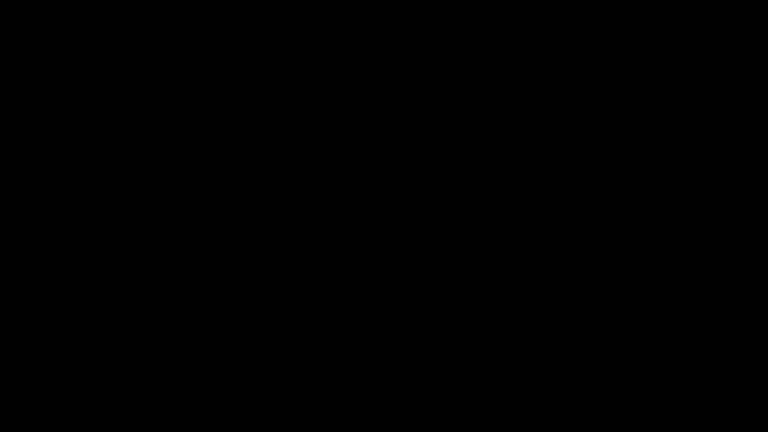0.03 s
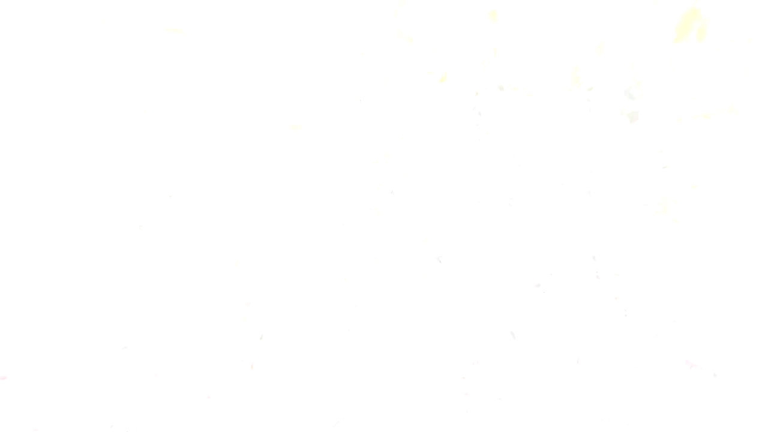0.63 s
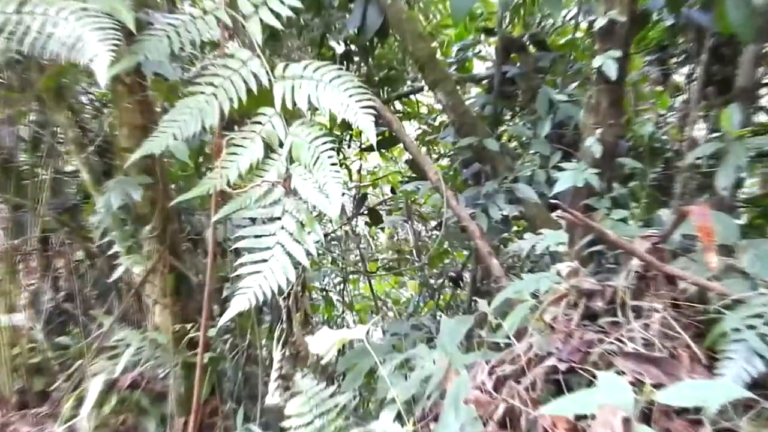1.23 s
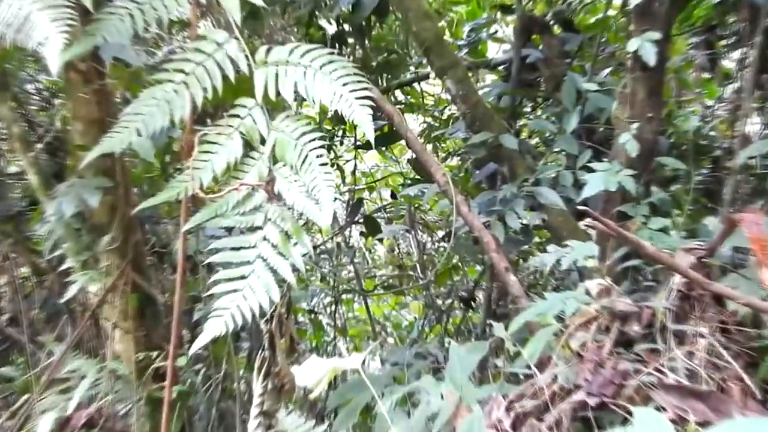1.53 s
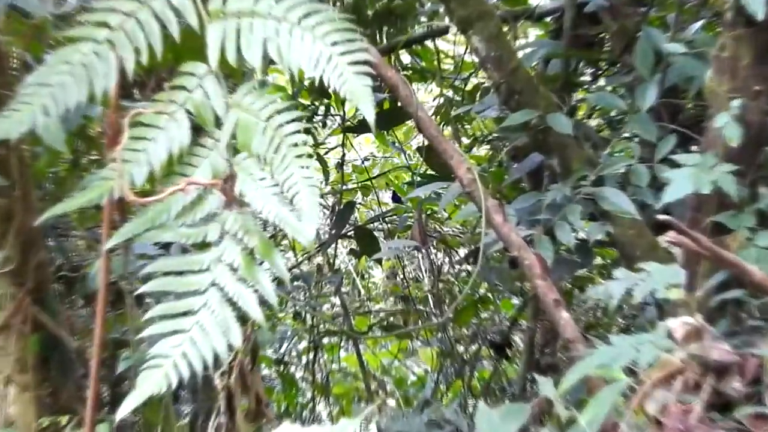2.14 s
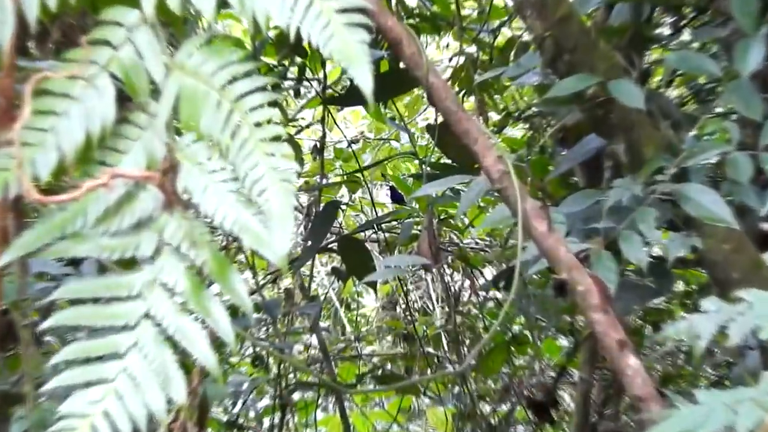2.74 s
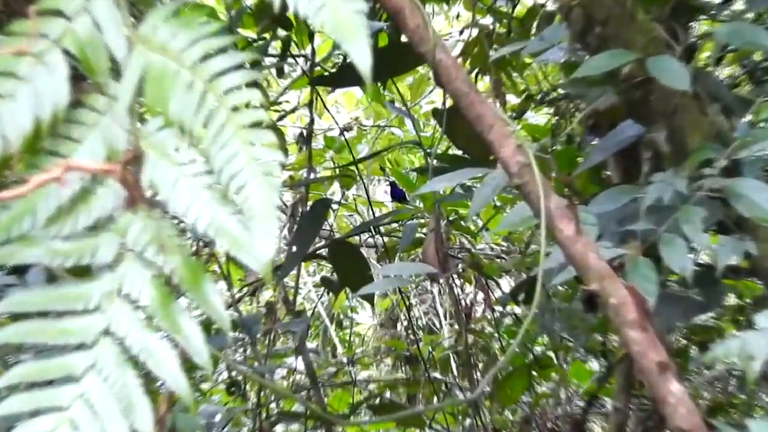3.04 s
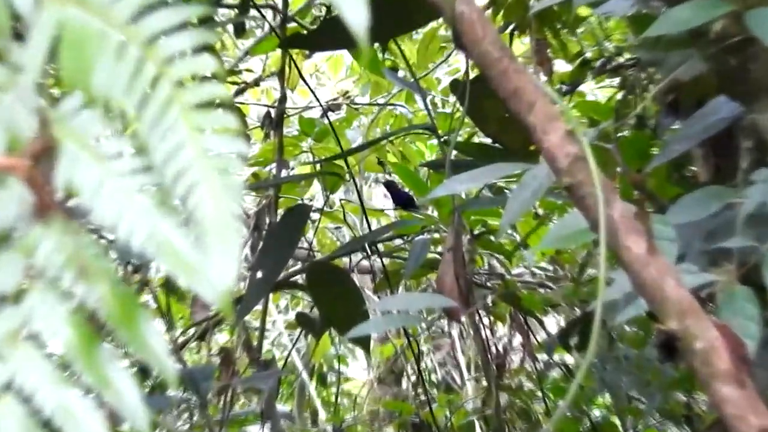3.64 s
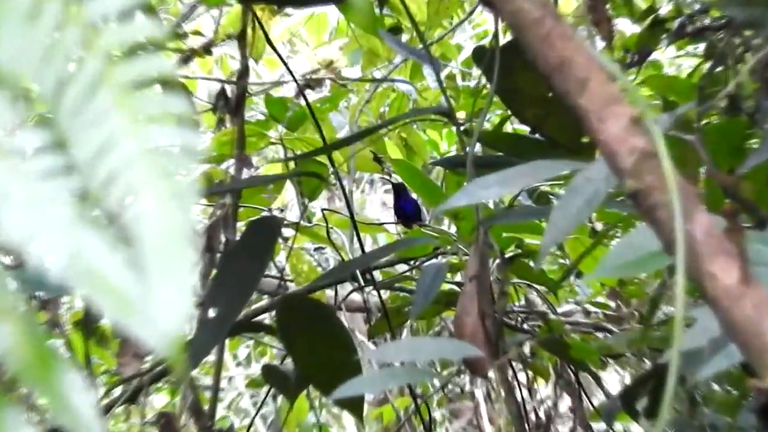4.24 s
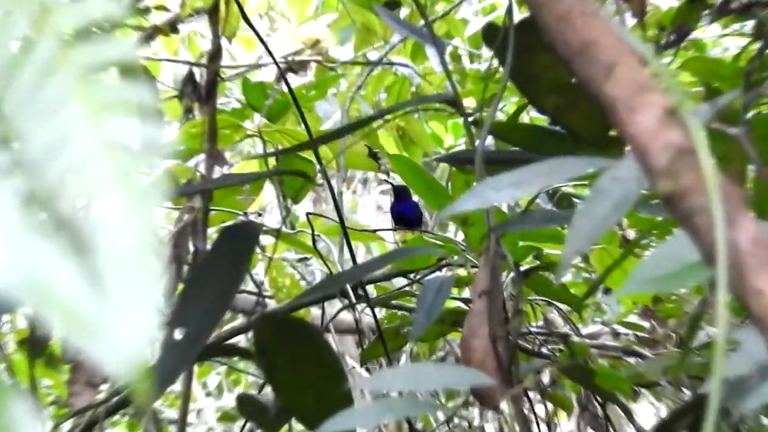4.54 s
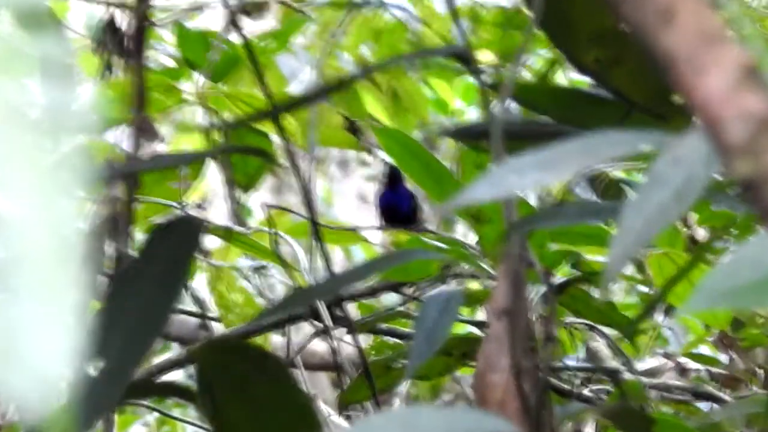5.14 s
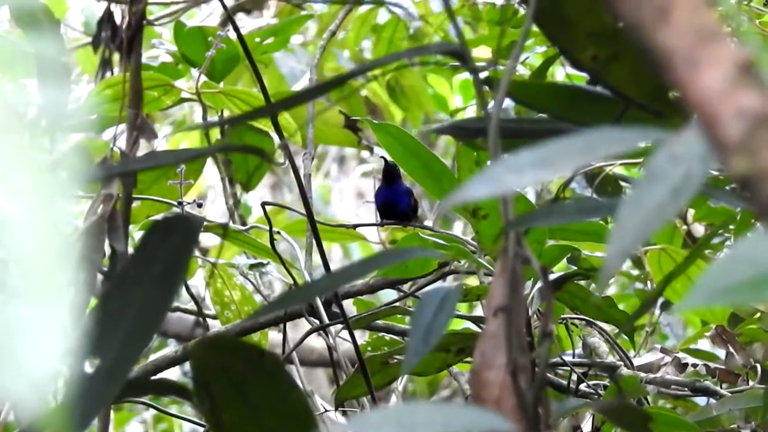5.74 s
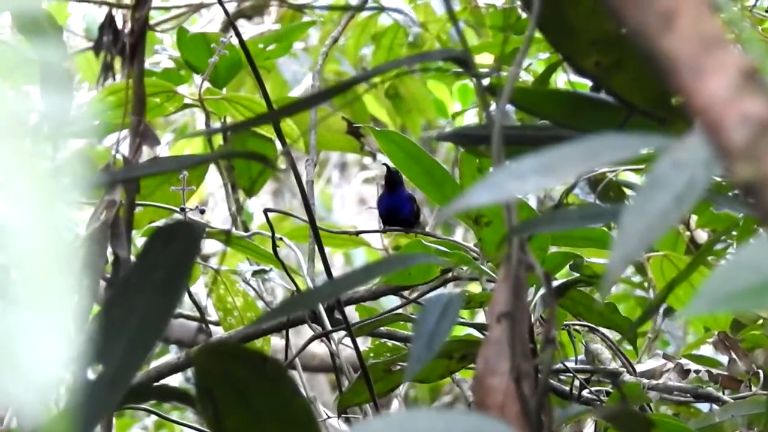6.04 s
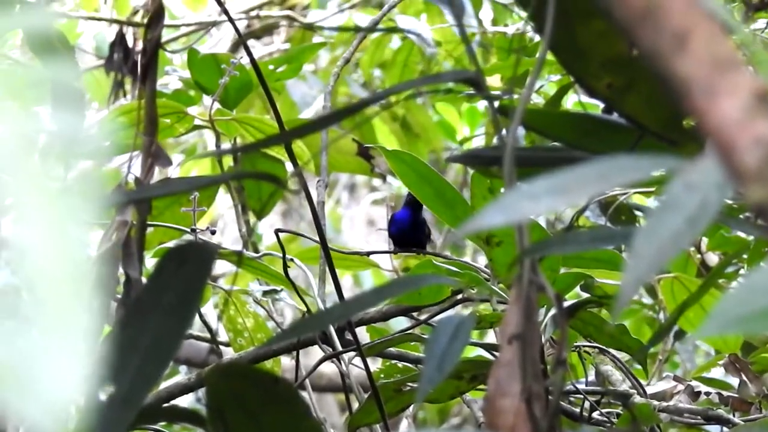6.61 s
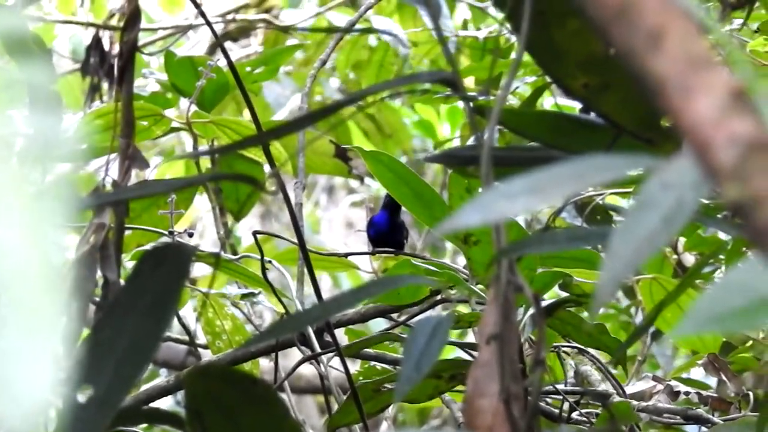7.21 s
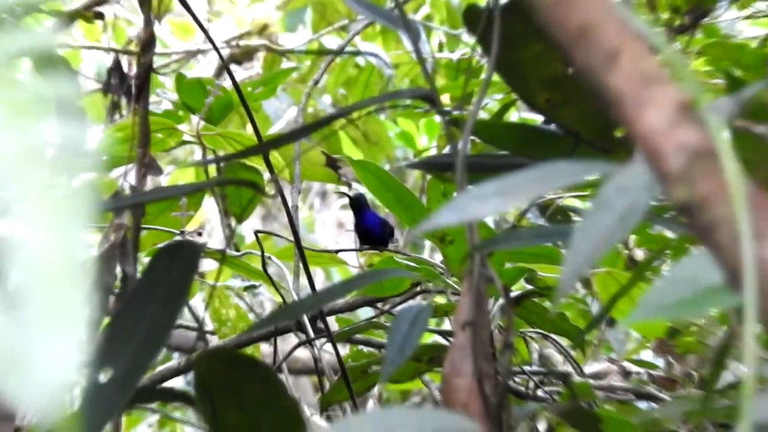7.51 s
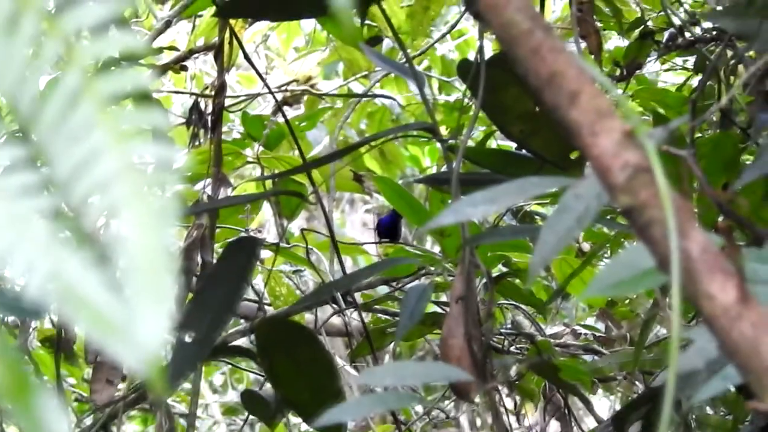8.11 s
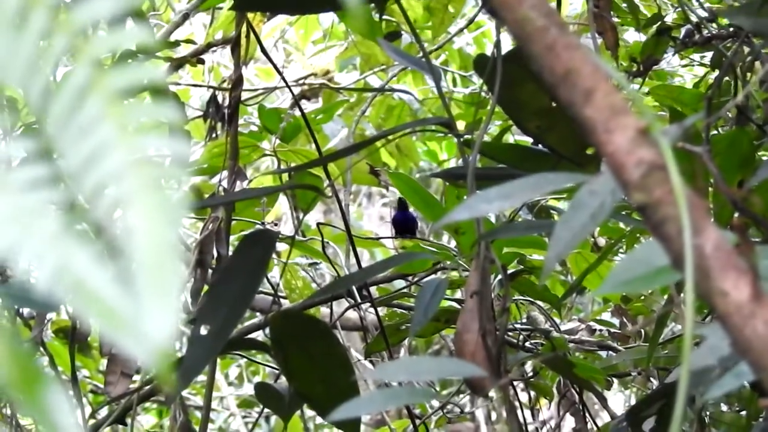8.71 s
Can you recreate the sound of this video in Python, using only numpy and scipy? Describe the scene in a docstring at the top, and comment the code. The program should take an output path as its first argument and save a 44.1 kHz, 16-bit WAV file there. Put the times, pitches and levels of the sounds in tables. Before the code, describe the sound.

A hummingbird repeats sharp, high chips in a forest, over a faint steady hiss.

```python
"""Dense forest, where a perched hummingbird gives sharp chips: long arched ones and short buzzy slurs.
Each is a frequency-modulated tone from the syrinx, loudest as its pitch passes about 6.3 kHz, then
scattered by leaves and trunks. Soft harmonic peeps fall between them, one distant whistle sounds and
twigs tick, over a faint hiss and air in the foliage. Bumps excite the modes of a hand-held camera.
The sound fades in at the start."""
import sys
import numpy as np
from scipy import signal
from scipy.fft import rfft, irfft, next_fast_len
from scipy.io import wavfile

SR = 44100
rng = np.random.default_rng(int(sys.argv[2]) if len(sys.argv) > 2 else 0)


def persist_wave(psi):
    """Save psi, clipped to +-1, as 16-bit WAV."""
    counts = np.round(np.clip(psi, -1, 1) * 32767).astype(np.int16)
    wavfile.write(sys.argv[1], SR, np.atleast_2d(counts).T)


N = 390726
TIME = np.arange(N) / SR
# loudness of a chip by pitch, greatest near 6.3 kHz: pitch_hz, gain_db
CHIP_LOUDNESS = [(4050, -20), (4400, -13.5), (5050, -16), (5750, -4), (6300, 2), (7000, -4), (7600, -9.5),
                 (8000, -13.5), (8300, -20), (9300, -22)]


def hummingbird():
    """Source and path: each chip is convolved with an impulse response of the forest."""
    # arched chips: start_s, plunge_at_s, pitch_ratio, level_db, top_gain_db
    arches = [(.9973, 0.067, 1.02, -20.5, 1), (2.4975, .070, .995, -25.5, 3),
              (3.8142, .070, 1.0, -22.5, -1), (4.893, 0.071, 1.0, -17.5, -1),
              (5.864, 0.071, 1.005, -16.5, -3), (6.681, .070, 1.01, -15, -0.5),
              (7.5236, 0.07, 1.0, -15, 2.5), (8.350, .0675, 1.0, -15, 1)]
    # down-slurs: start_s, length_s, pitch_ratio, level_db, buzz_gain_db, buzz_fade_s
    slurs = [(1.536, 0.05, .955, -23.5, 7, 0.0087), (2.969, 0.048, .95, -21, 10.5, 0.0092),
             (4.292, 0.059, 1.0, -17.5, 5, 0.0037)]
    out = np.zeros((2, N))
    for start_s, plunge_at_s, pitch_ratio, level_db, top_gain_db in arches:
        call = from_db(level_db) * arch(plunge_at_s, pitch_ratio, top_gain_db)
        add(out, start_s, forest(call, wet_db=-1.8, pan_db=-1.5, leaves_t60_s=.2, trunks_t60_s=.66))
    for start_s, length_s, pitch_ratio, level_db, buzz_gain_db, buzz_fade_s in slurs:
        call = from_db(level_db) * slur(length_s, pitch_ratio, buzz_gain_db, buzz_fade_s)
        add(out, start_s, forest(call, wet_db=-4, pan_db=-1.5, leaves_t60_s=.26, trunks_t60_s=.76))
    return out * from_db([[-.5], [.5]])


def arch(plunge_at_s, pitch_ratio, top_gain_db, start_hz=4992, top_hz=8212, end_hz=3990):
    """Frequency sweep: a tone flicks up, holds and plunges, loudest as it passes about 6.3 kHz."""
    length_s = plunge_at_s + .03
    t = np.arange(int(length_s * SR)) / SR
    flick, plunge = glide(t, .0056), glide(t - plunge_at_s, .012)
    sag_hz = 423 * np.exp(-((t - .04) / .016) ** 2)   # the top sags in its middle
    hz = start_hz + (top_hz - start_hz) * flick + (end_hz - top_hz) * plunge - sag_hz
    on_top = np.interp(hz, [7400, 7900], [0, 1])
    level_db = at_hz(CHIP_LOUDNESS, hz) + top_gain_db * on_top
    call = syrinx(hz * pitch_ratio, level_db, waver=.012, rasp_db=-35.5, octave_db=0)
    return call * envelope(t, length_s, attack_s=.0065, release_s=.01)


def slur(length_s, pitch_ratio, buzz_gain_db, buzz_fade_s, start_hz=9480, shelf_hz=7410, end_hz=6020):
    """Modulation sidebands: between two drops in pitch, a flutter of frequency and level makes a buzz."""
    flutter_hz, swing_hz, dip_db = 265, 520, 7
    t = np.arange(int(length_s * SR)) / SR
    first_drop, second_drop = glide(t - .005, .0078), glide(t - .028, .00956)
    hz = start_hz + (shelf_hz - start_hz) * first_drop + (end_hz - shelf_hz) * second_drop
    buzz = first_drop * (1 - glide(t - .028, buzz_fade_s))
    flutter = np.cos(2 * np.pi * flutter_hz * t)
    buzz_db = buzz * (buzz_gain_db - dip_db * (1 - flutter))   # loudest when the pitch swings down
    pitch_hz = hz * pitch_ratio - swing_hz * buzz * flutter
    call = syrinx(pitch_hz, at_hz(CHIP_LOUDNESS, hz) + buzz_db, waver=.0059, rasp_db=-52, octave_db=3)
    return call * envelope(t, length_s, attack_s=.002, release_s=.013)


def syrinx(hz, level_db, waver, rasp_db, octave_db):
    """A nearly sinusoidal oscillator with jitter; a rough octave and a faint rasp grow at low pitch."""
    # second harmonic against the fundamental: pitch_hz, gain_db
    octave = [(4400, -7), (5100, -15.5), (5900, -40.5), (7000, -40), (8000, -45)]
    phase = 2 * np.pi * np.cumsum(hz * (1 + waver * wander(len(hz), 1191))) / SR
    overtone = from_db(octave_db + at_hz(octave, hz)) * np.sin(2 * phase + .5 * wander(len(hz), 1500))
    rasp = rms_one(bandpass(rng.standard_normal(len(hz)), 8500, 12500, order=3))
    rasp_gain = from_db(rasp_db) * np.interp(hz, [6200, 7400], [1, 0])
    return from_db(level_db) * (np.sin(phase) + overtone + rasp_gain * rasp)


def forest(call, wet_db, pan_db, leaves_t60_s=.17, trunks_t60_s=1.0):
    """Multiple scattering: direct sound, quick echoes off leaves and a longer tail from the trunks."""
    t = np.arange(SR * 3 // 4) / SR
    mid, side, lumps = rng.standard_normal((3, len(t)))
    leaves, trunks = from_db(-60 * t / leaves_t60_s), from_db(-11 - 60 * t / trunks_t60_s)
    onset = np.clip((t - .002) / .003, 0, 1)
    decay = (leaves + trunks) * onset * from_db(4 * lumps)
    echoes = from_db(wet_db) * pair(mid, side, coherence=.45) * decay / np.linalg.norm(decay)
    # the straight path through the leaves favours the middle of the bird's range
    direct = bandpass(1. * (t == 0), 5100, 7700, order=1) * from_db([[pan_db / 2], [-pan_db / 2]])
    return signal.fftconvolve(call[None], echoes + direct, axes=1)


def peeps(start_hz=1895, top_hz=2215, end_hz=1430, droop_at_s=.022, length_s=.06):
    """Spectral envelope: harmonics of a rising, then drooping note are brightest at about 4.7-7 kHz."""
    # soft peeps: start_s, level_db
    notes = [(.213, -32.5), (2.04, -37), (3.397, -40), (5.390, -32)]
    # colour of a peep, the strength of a harmonic by its frequency: frequency_hz, gain_db
    colour = [(1500, -32), (2200, -37), (3100, -4), (3700, -8), (4350, -15), (4750, 6), (5400, -1.5),
              (6400, 4), (6900, 0.5), (8800, -28), (12000, -50)]
    out, t = np.zeros((2, N)), np.arange(int(length_s * SR)) / SR
    rise, droop = glide(t, .0031), glide(t - droop_at_s, .0095)
    hz = start_hz + (top_hz - start_hz) * rise + (end_hz - top_hz) * droop
    accent_db = 9.5 * (.5 - glide(t, .0079))
    droop_db = -7.5 * glide(t - droop_at_s, .0031)
    phase = 2 * np.pi * np.cumsum(hz) / SR
    harmonics = sum(from_db(at_hz(colour, k * hz)) * np.sin(k * phase) for k in range(1, 6))
    note = from_db(accent_db + droop_db) * harmonics * envelope(t, length_s, attack_s=.004, release_s=.008)
    for start_s, level_db in notes:
        add(out, start_s, forest(from_db(level_db) * note, wet_db=-2, pan_db=-3))
    return out


def whistle(start_s=2.9, length_s=.62, release_s=.068, pitch_hz=937, level_db=-57):
    """Interference: a distant wavering note, sinking as it ends, beats against its own echo."""
    # pushes of effort that lift pitch and level together: start_s, hold_s, relax_s
    pushes = [(3.055, 0.041, 0.013), (3.253, 0.047, .065)]
    push_hz, push_db, sink_hz, echo_s, echo_db = 41, 4, 35, .043, -10
    effort = sum(glide(TIME - at_s, .019) * (1 - glide(TIME - at_s - hold_s, relax_s))
                 for at_s, hold_s, relax_s in pushes)
    t = TIME - start_s
    ending = glide(t - length_s + 2 * release_s, release_s)
    hz = pitch_hz + push_hz * effort - sink_hz * ending
    phase = 2 * np.pi * np.cumsum(hz * (1 + .0062 * wander(N, 90))) / SR
    gain = from_db(level_db + push_db * effort) * envelope(t, length_s, attack_s=.22, release_s=release_s)
    note = np.sqrt(2) * gain * np.sin(phase)
    return note + from_db(echo_db) * np.interp(TIME - echo_s, TIME, note)


def bumps(contact_s=.0031, grit=.99):
    """Impact excitation: a gritty contact rings the camera's case while the push thuds in the grip."""
    # knocks on the camera: start_s, click_db, thud_db
    knocks = [(2.204, -40.5, -49.5), (2.338, -74, -51), (2.598, -52, -50.5), (2.859, -37, -40),
              (2.8639, -47, -41), (3.599, -45, -70), (5.823, -46.5, -64), (5.869, -51, -55),
              (8.167, -50, -64), (8.351, -50, -58)]
    # modes of the case and of the grip: frequency_hz, gain_db, t60_s
    case_modes = [(508, -7.5, 0.034), (884, -4, 0.038), (988, -5.5, 0.036), (1170, -7, 0.031),
                  (1690, -11.5, 0.043)]
    grip_modes = [(150, -2.5, 0.053), (222.3, -1, 0.2)]
    clicks, thuds = np.zeros((2, 2, N))
    t = np.arange(SR // 100) / SR
    for start_s, click_db, thud_db in knocks:
        scuff = pair(*rng.standard_normal((2, len(t))), coherence=.82) * np.exp(-t / contact_s)
        add(clicks, start_s, from_db(click_db) * ((t == 0) + grit * scuff / np.linalg.norm(scuff[0])))
        add(thuds, start_s, from_db(thud_db + np.array([[1.5], [-1.5]])))
    soft = signal.butter(2, 4000, fs=SR, output="sos")   # fingers make a dull contact
    return signal.sosfilt(soft, ring(clicks, case_modes) + ring(thuds, grip_modes))


def ring(force, modes):
    """Modal superposition: damped resonators, each radiating little below its own frequency."""
    out = 0
    for hz, gain_db, t60_s in modes:
        radius, angle = from_db(-60 / (t60_s * SR)), 2 * np.pi * hz / SR
        feedback = [1, -2 * radius * np.cos(angle), radius ** 2]
        out = out + from_db(gain_db) * signal.lfilter([.5, 0, -.5], feedback, force + 1e-18)
    return out


def hand_shifts(width_s=.015, left_lead_rad=1.0):
    """Wave packets: each shift of the grip is a dull swell of a few cycles, leading on the left."""
    # soft shifts of the hand: centre_s, pitch_hz, level_db
    shifts = [(2.346, 174, -46), (2.39, 142, -48.5), (2.62, 150, -49.5), (3.89, 75, -50), (5.269, 70, -60),
              (6.801, 78.5, -52), (8.365, 68, -53)]
    out = np.zeros((2, N))
    t = np.arange(int(6 * width_s * SR)) / SR - 3 * width_s
    for centre_s, pitch_hz, level_db in shifts:
        phase = 2 * np.pi * pitch_hz * t + np.array([[left_lead_rad], [0]])
        add(out, centre_s + t[0], from_db(level_db) * np.exp(-(t / width_s) ** 2) * np.sin(phase))
    return out * from_db([[2.5], [-3]])


def ticks(decay_s=.0013):
    """Broadband transients: twigs and dry leaves snap in exponentially decaying bursts of noise."""
    # snaps in the undergrowth: start_s, level_db
    snaps = [(3.346, -51), (3.545, -54), (3.600, -52), (5.8225, -39)]
    out, t = np.zeros(N), np.arange(SR // 100) / SR
    for start_s, level_db in snaps:
        add(out, start_s, from_db(level_db) * rng.standard_normal(len(t)) * np.exp(-t / decay_s))
    return 2 * bandpass(out, 3200, 7000, order=2)


def background(stir_width_s=.016):
    """Amplitude-modulated noise: air in the foliage, a high hiss and the hand's rumble on the camera."""
    # spectral densities of the three noises: frequency_hz, relative_db
    air_spectrum = [(15, -48), (25, -38), (71, -16.5), (140, -7), (218, -0.5), (439, -6), (747, -6.5),
                    (831, -7), (944, -8), (1540, -10.5), (2910, -12), (3380, -11.5), (4000, -16.5),
                    (5200, -44), (8800, -120)]
    hiss_spectrum = [(2060, -37), (3500, -10.5), (3960, -13.5), (4300, -6.5), (4630, -8), (6210, 0),
                     (9240, -23), (12900, -35.5), (13900, -41), (15500, -56)]
    rumble_spectrum = [(20, -14), (50, -4.5), (85, 3), (140, -16), (400, -56), (2000, -110)]
    # slow drift of the levels: time_s, air_db, hiss_db
    drift = [(2.0, -59.5, -52.5), (3.31, -55, -50), (3.63, -55.5, -50.5), (5.09, -57, -50.5),
             (8.8, -59, -54)]
    # brief swells of the air as leaves stir: centre_s, gain_db
    stirs = [(6.92, 0.5), (7.295, 5)]
    times_s, *levels_db = np.transpose(drift)
    air_db, hiss_db = [np.interp(TIME, times_s, column) for column in levels_db]
    stir_db = sum(db * np.exp(-((TIME - centre_s) / stir_width_s) ** 2) for centre_s, db in stirs)
    air = from_db(air_db + stir_db + 1.5 * wander(N, 12)) * stereo_noise(air_spectrum)
    hiss = from_db(hiss_db + 1.5 * wander(N, 25)) * stereo_noise(hiss_spectrum)
    rumble = from_db(-76 + 4 * wander(N, 18)) * stereo_noise(rumble_spectrum)
    return air + hiss + rumble * from_db([[3], [-3]])


def stereo_noise(spectrum):
    """A partly coherent field: coloured noise of unit rms whose left-right likeness varies with pitch."""
    # likeness of left and right: frequency_hz, coherence
    likeness = [(30, .05), (70, 0.18), (160, 0.9), (400, 0.86), (1200, 0.92), (3000, 0.87), (6500, 0.38),
                (9000, 0.12), (14000, 0.067)]
    size = next_fast_len(N)
    hz = np.maximum(np.arange(size // 2 + 1) * SR / size, 1)
    mid, side = rfft(rng.standard_normal((2, size))) * from_db(at_hz(spectrum, hz))
    return rms_one(irfft(pair(mid, side, at_hz(likeness, hz)), size)[:, :N])


def pair(mid, side, coherence):
    """Sum and difference of two independent noises give left and right a set coherence."""
    return np.sqrt((1 + coherence) / 2) * mid + np.sqrt((1 - coherence) / 2) * side * np.array([[1], [-1]])


def glide(t, time_s, shape=1.6):
    """Relaxation from 0 to 1, from t = 0; a shape above 1 sets off more gently than an exponential."""
    return 1 - np.exp(-(np.maximum(t, 0) / time_s) ** shape)


def envelope(t, length_s, attack_s, release_s):
    """Trapezoidal gain: attack, hold and release."""
    return np.clip(t / attack_s, 0, 1) * np.clip((length_s - t) / release_s, 0, 1)


def wander(size, rate_hz):
    """Random modulation: normal draws at rate_hz, joined by straight lines."""
    return np.interp(np.arange(size) * rate_hz / SR, np.arange(4096), rng.standard_normal(4096))


def bandpass(x, low_hz, high_hz, order):
    """Maximally flat band-pass filtering."""
    return signal.sosfilt(signal.butter(order, [low_hz, high_hz], "band", fs=SR, output="sos"), x)


def at_hz(curve, hz):
    """Interpolation on a log-frequency axis."""
    knots_hz, values = np.transpose(curve)
    return np.interp(np.log(hz), np.log(knots_hz), values)


def from_db(db):
    """Decibels to amplitude ratio."""
    return 10 ** (np.asarray(db) / 20)


def rms_one(x):
    """Normalisation to unit rms."""
    return x / np.sqrt(np.mean(x ** 2) + 1e-20)


def add(out, start_s, sound):
    """Superposition of a sound on the mix, from start_s."""
    start = int(start_s * SR)
    out[..., start:start + sound.shape[-1]] += sound[..., :N - start]


def scene():
    """Linear superposition of the bird, the forest around it and the hand on the camera."""
    return hummingbird() + peeps() + whistle() + ticks() + bumps() + hand_shifts() + background()


def record(dry, fade_at_s=.11, fade_s=1.68, cutoff_hz=15650):
    """Band limiting: a steep low-pass cuts the top after a linear fade-in."""
    fade = np.clip((TIME - fade_at_s) / fade_s, 0, 1)
    return signal.sosfilt(signal.ellip(10, .1, 80, cutoff_hz, fs=SR, output="sos"), dry * fade)


dry = scene()
out = record(dry)
persist_wave(out)
```